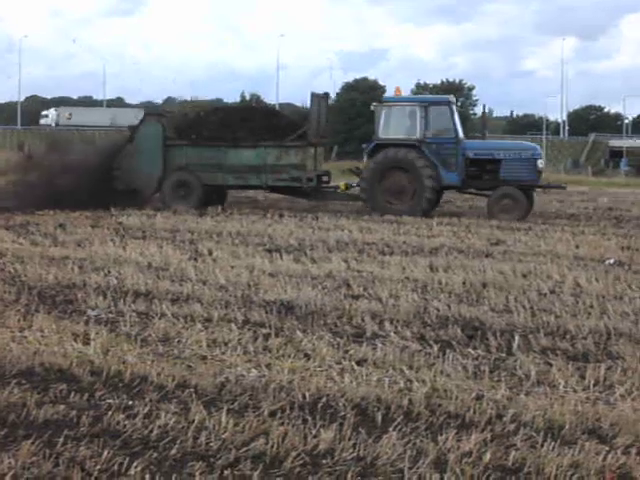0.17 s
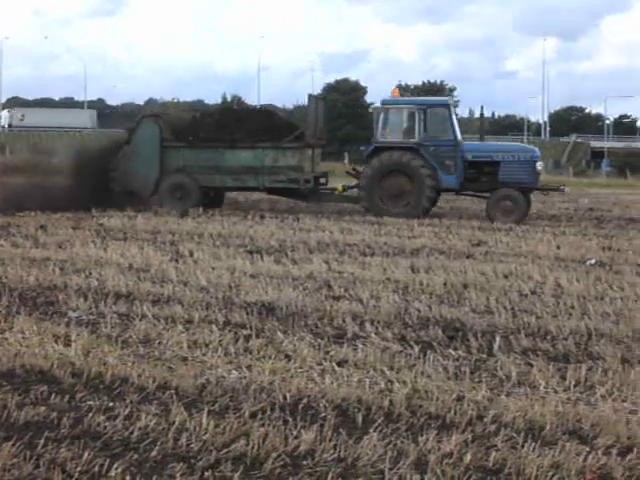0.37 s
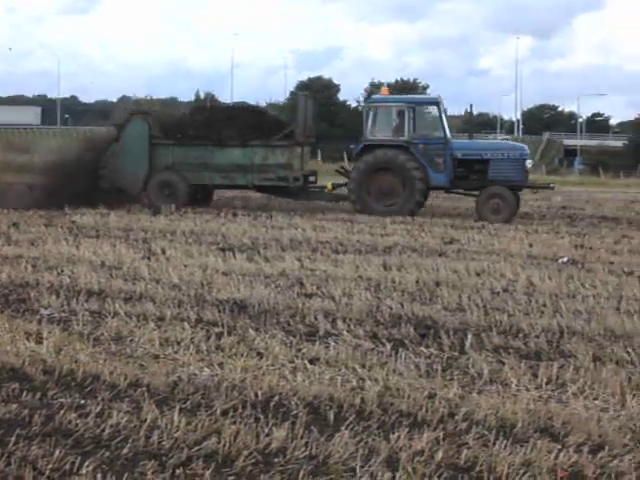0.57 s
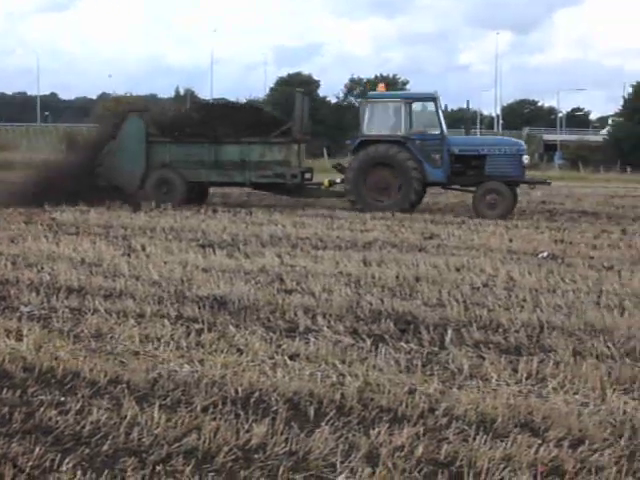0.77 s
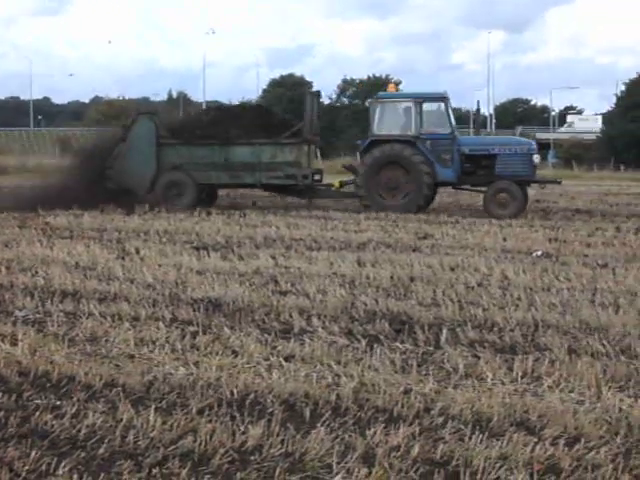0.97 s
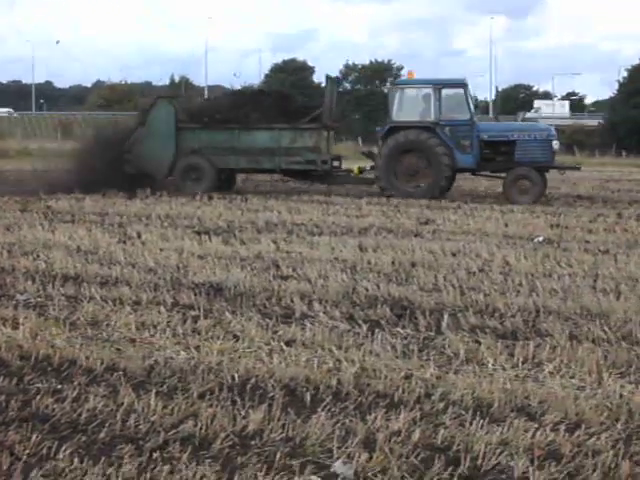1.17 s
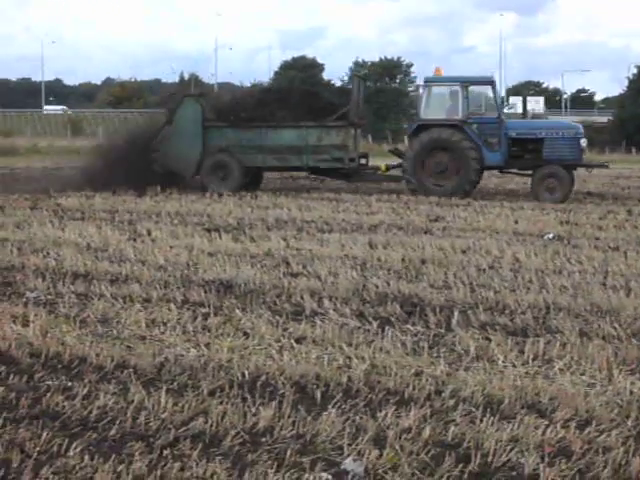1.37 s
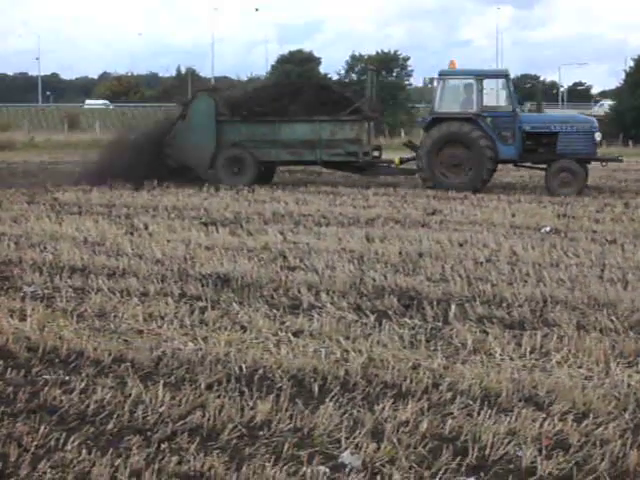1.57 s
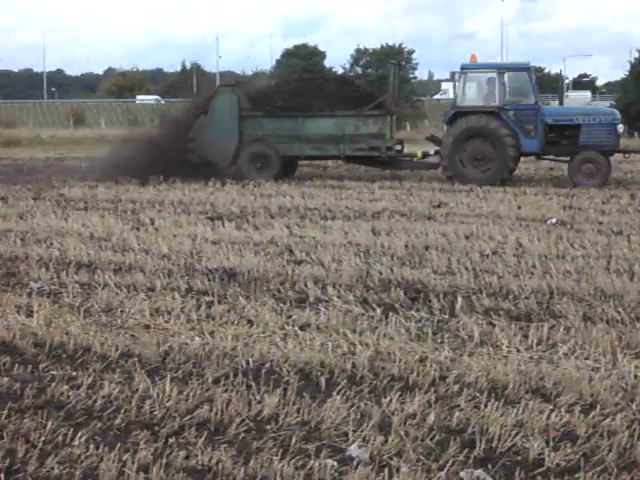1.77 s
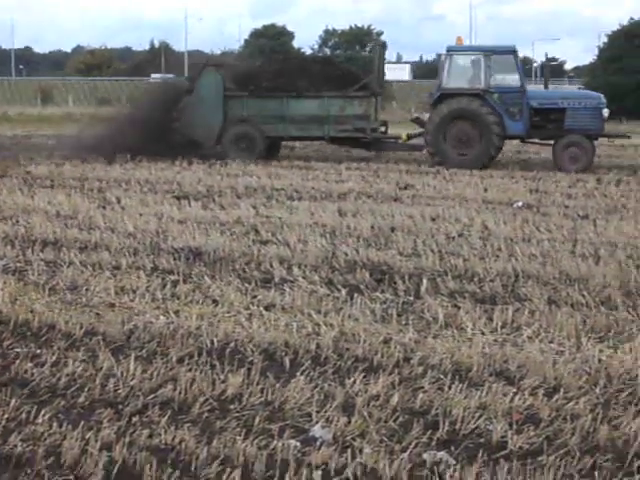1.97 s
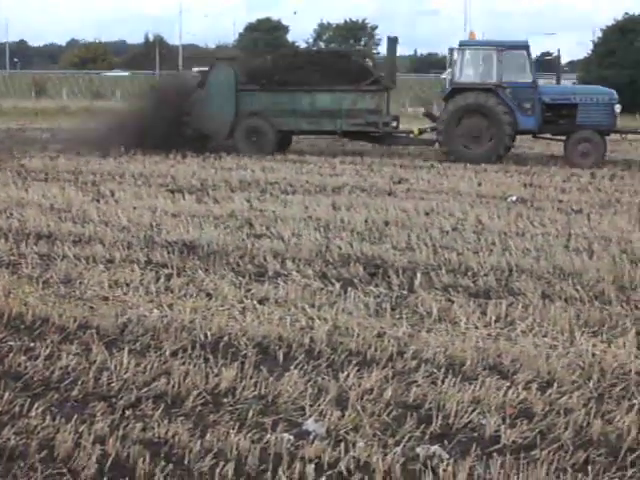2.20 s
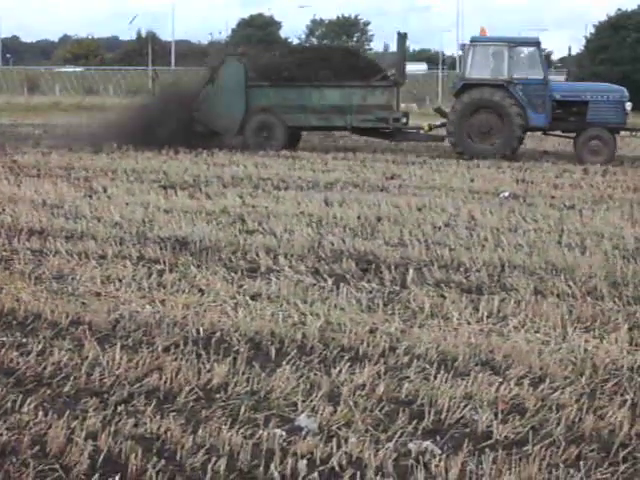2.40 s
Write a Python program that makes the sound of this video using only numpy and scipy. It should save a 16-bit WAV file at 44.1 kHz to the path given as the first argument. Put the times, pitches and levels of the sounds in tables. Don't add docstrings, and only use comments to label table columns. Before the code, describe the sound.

A diesel tractor drones steadily, pulling a rattling muck spreader across an open windy field

```python
import sys
import numpy as np
from scipy import signal
from scipy.io import wavfile
from scipy.ndimage import uniform_filter1d

SR = 44100
rng = np.random.default_rng(int(sys.argv[2]) if len(sys.argv) > 2 else 0)


def transcribe(signal):
    frames = np.atleast_2d(signal).T
    limited = np.clip(frames, -1, 1)
    pcm = np.round(limited * 32767).astype(np.int16)
    wavfile.write(sys.argv[1], SR, pcm)


def voltage_ratio(decibels):
    exponent = np.asarray(decibels, float) / 20
    return 10 ** exponent


N = 112014
TIME_S = np.arange(N) / SR
FIRING_HZ = 53.95


def rms_one(x):
    return x / np.sqrt(np.mean(x ** 2) + 1e-20)


def drift(rate_hz):
    r = np.exp(-80 * np.pi * rate_hz / SR)
    chance = rng.standard_normal(N // 40 + 2002)
    slow = signal.lfilter([1], [1, -2 * r, r * r], chance)[2000:]
    return np.interp(np.arange(N) / 40, np.arange(len(slow)), rms_one(slow))


def curve(table):
    return np.interp(TIME_S, *np.transpose(table))


def resonance(x, hz, width_hz):
    r = np.exp(-np.pi * width_hz / SR)
    zeros = np.array([1, 0, -1]) * (1 - r * r) / 2
    poles = [1, -2 * r * np.cos(2 * np.pi * hz / SR), r * r]
    return signal.lfilter(zeros, poles, x + 1e-18)


def coloured(spectrum, patchy_db, fast_hz):
    table_hz, table_db = np.transpose(spectrum)
    edges_hz = 16 * 2 ** np.arange(0, 8.4, 1 / 3)
    together = drift(fast_hz)
    white = rng.standard_normal((2, N))
    out = 0
    for k, (low, high) in enumerate(zip(edges_hz, edges_hz[1:])):
        sos = signal.butter(2, [low, high], "band", fs=SR, output="sos")
        band = signal.sosfilt(sos, white[k % 2])
        band_db = np.interp(np.log(low * high) / 2, np.log(table_hz), table_db, left=-70, right=-70)
        flicker_db = patchy_db * (0.43 * together + 0.95 * drift(fast_hz))
        out = out + voltage_ratio(band_db + flicker_db) * band
    return rms_one(out)


def beats(hz, jitter_s, spread_db):
    chance = rng.standard_normal((200, 2))
    at = ((np.arange(200) / hz + .005 + jitter_s * chance[:, 0]) * SR).astype(int)
    inside = (at >= 0) & (at < N)
    clicks = np.zeros(N)
    clicks[at[inside]] = voltage_ratio(spread_db * chance[:, 1])[inside]
    return clicks


# multiple of firing rate, level/dB
EXHAUST_TONES = [(1, -28), (2, -23.5), (4, -36), (23, -41)]
REV_WANDER, ORDER_SWAY_DB = 0.0019, 3


def exhaust():
    phase = 2 * np.pi * np.cumsum(FIRING_HZ * (1 + REV_WANDER * drift(0.88))) / SR
    out = 0
    for order, db in EXHAUST_TONES:
        level = np.sqrt(2) * voltage_ratio(db + ORDER_SWAY_DB * drift(12.0))
        out = out + level * np.sin(order * phase + order)
    return out


# f/Hz, level per Hz/dB
KNOCK_SPECTRUM = [(1300, -25.5), (1700, -1.5), (2100, -10), (2600, -0.5), (3300, 2.5), (3900, -7.5),
                  (4600, -5.5), (5400, -10)]
# f/Hz, width/Hz, level/dB
ENGINE_PARTS = [(1710, 72, -38), (2407, 86, -33.5), (4130, 310, -42.5)]
KNOCK_DB, KNOCK_GATE, KNOCK_DECAY_S = -30.5, .75, .005


def knock():
    pole = np.exp(-1 / (KNOCK_DECAY_S * SR))
    firings = beats(FIRING_HZ, jitter_s=.0008, spread_db=2.2)
    flare = uniform_filter1d(signal.lfilter([1], [1, -pole], firings), size=160)
    gate = rms_one(1 - KNOCK_GATE + KNOCK_GATE * rms_one(flare))
    parts = 0
    for hz, width_hz, db in ENGINE_PARTS:
        parts = parts + voltage_ratio(db) * rms_one(resonance(rng.standard_normal(N), hz, width_hz))
    clatter = voltage_ratio(KNOCK_DB) * coloured(KNOCK_SPECTRUM, patchy_db=2.5, fast_hz=13)
    return gate * clatter + rms_one(gate ** 2) * parts


# f/Hz, width/Hz, level/dB
HOUSING_MODES = [(38, 4.3, -53.5), (76.16, 6, -27.5), (134, 9.4, -30), (151.8, 21.2, -22), (170, 14, -28.5),
                 (209.3, 13, -34.5)]
# t/s, level/dB
BITE_DEPTH = [(0.0, -17), (0.06, -29), (0.18, -17.5), (0.2, -20), (0.5, -24.5), (0.54, -17.5), (0.61, -25),
              (1.2, -20.5), (1.22, -27), (1.28, -21.5), (1.34, -35.5), (1.39, -16.5), (1.52, -31),
              (1.53, -18.5), (2.07, -26.5), (2.1, -17), (2.17, -24), (2.54, -20)]
TINE_HZ = 37.7
EVEN_SHARE = 0.82


def drum(tines):
    push = rms_one(tines) + .8 * rng.standard_normal(N)
    rings = []
    for hz, width_hz, db in HOUSING_MODES:
        ring = resonance(resonance(push, hz, width_hz), hz, 2 * width_hz)
        rings.append(voltage_ratio(db) * rms_one(ring))
    boom = sum(rings[2:5])
    swell = rms_one(np.sqrt(uniform_filter1d(boom ** 2, size=2600) + 1e-6))
    bite_db = curve(BITE_DEPTH)
    return sum(rings) - boom + voltage_ratio(bite_db - bite_db.mean()) * boom / swell ** EVEN_SHARE


CLODS_PER_S, CLOD_DB, CLOD_CYCLES, CLOD_TINE_SHARE = 400, -34.5, 5.1, 0.33


def clods(tines):
    spray = 1 - CLOD_TINE_SHARE + CLOD_TINE_SHARE * rms_one(uniform_filter1d(tines, size=400))
    sizes = voltage_ratio(4.8 * np.minimum(rng.exponential(1, N), 4)) * rng.choice([-1, 1], N)
    born = rng.random(N) < CLODS_PER_S * spray / SR
    dealt = rng.integers(0, 14, N)
    patter = 0
    for k, hz in enumerate(np.geomspace(900, 3700, 14)):
        patter = patter + resonance(sizes * born * (dealt == k), hz, 3.0 * hz / CLOD_CYCLES)
    return voltage_ratio(CLOD_DB) * rms_one(patter)


def beaters():
    tines = beats(TINE_HZ, jitter_s=.002, spread_db=3.5)
    return drum(tines) + clods(tines)


# t/s, peak level/dB, f/Hz, length/s
STONE_HITS = [(.034, -20.5, 2800, 0.012), (0.046, -12.5, 3150, 0.0013), (0.114, -14.5, 2600, 0.0057),
              (.888, -13.5, 3740, .008), (.985, -7.5, 3360, 0.0076), (.991, -10, 2380, 0.0058),
              (1.040, -24, 3380, .005), (1.21, -15.5, 2900, .004), (1.337, -6.5, 3420, 0.003),
              (1.637, 1.5, 3550, 0.0086), (1.64, 2, 1500, .007), (1.784, -17.5, 2680, 0.0044),
              (1.949, -15, 3100, 0.0037), (2.034, -25, 2500, 0.0071), (2.127, -8, 2800, 0.0032),
              (2.198, -7, 3074, 0.0069), (2.234, -6, 3320, .005)]
STONE_WIDTH, STONE_RISE_S, STONE_TAIL_S = 0.39, 0.0011, 0.0025


def stones():
    out, t = np.zeros(N + SR), np.arange(2000) / SR
    noises = rng.standard_normal((len(STONE_HITS), 2000))
    for (start_s, db, hz, length_s), noise in zip(STONE_HITS, noises):
        tail = np.exp(-np.maximum(t - length_s, 0) / STONE_TAIL_S)
        shape = np.clip(t / STONE_RISE_S, 0, 1) * tail
        burst = shape * resonance(noise, hz, STONE_WIDTH * hz)
        first = int(start_s * SR)
        out[first:first + 2000] += voltage_ratio(db) * burst / np.abs(burst).max()
    return out[:N]


# t/s, peak level/dB, f/Hz, t60/s
PANEL_RINGS = [(.987, -16, 1440, .045), (.891, -16, 1390, .045), (1.643, -8, 1075, .045),
               (1.6425, -12, 1805, .05), (1.6445, -14, 1455, .045), (2.120, -9, 455, .075),
               (2.123, -13, 520, .06), (2.125, -14, 615, .045), (2.036, -16, 2485, .065),
               (1.051, -16, 1005, .055)]
PANEL_RISE_S = 0.0026


def panels():
    out = 0
    for start_s, db, hz, t60_s in PANEL_RINGS:
        t = TIME_S - start_s
        decay = np.exp(-np.log(1000) * np.maximum(t, 0) / t60_s)
        rise = np.clip(t / PANEL_RISE_S, 0, 1)
        out = out + voltage_ratio(db) * rise * decay * np.sin(2 * np.pi * hz * t)
    return out


# f/Hz, level per Hz/dB
ROAR_SPECTRUM = [(210, -29.5), (350, -7), (448, -9), (542, -9), (880, 2), (1560, -10), (2170, -14),
                 (2450, -11.5), (3100, -11), (4030, -42), (6820, -120)]
# t/s, level/dB
EFFORT = [(0.0, -21), (1.36, -22.5), (1.85, -22.5), (2.26, -22), (2.54, -21.5)]
ROAR_DB = -17


def roar():
    effort_db = curve(EFFORT)
    level = voltage_ratio(ROAR_DB + effort_db - effort_db.mean())
    return level * coloured(ROAR_SPECTRUM, patchy_db=1.01, fast_hz=25.7)


# f/Hz, level per Hz/dB
WIND_SPECTRUM = [(20, -13), (45, 1.5), (100, -1.5), (180, -5), (260, 0), (450, -13.5), (700, -20.5)]
# t/s, peak level/dB, f/Hz
WIND_THUMPS = [(0.013, -15.5, 165), (.108, -21, 160), (0.156, -11, 153.5), (0.219, -16, 170),
               (0.556, -6, 127), (0.874, -4.5, 119), (1.265, -9, 130), (1.286, -6, 138), (1.602, -6, 109),
               (1.805, -18.5, 170), (2.318, -15, 170), (2.470, -11.5, 150)]
WIND_DB, THUMP_CYCLES = -22.5, 0.63


def wind():
    thumps = 0
    for centre_s, db, hz in WIND_THUMPS:
        t = TIME_S - centre_s
        bell = np.exp(-(t * hz / THUMP_CYCLES) ** 2)
        thumps = thumps + voltage_ratio(db) * np.cos(2 * np.pi * hz * t) * bell
    return voltage_ratio(WIND_DB) * coloured(WIND_SPECTRUM, patchy_db=0.0, fast_hz=2.2) + thumps


def scene():
    return (exhaust() + knock() + beaters() + stones() + panels() + roar() + wind())[None]


# t/s, peak level/dB
OVERLOAD_TICKS = [(.0110, -15.5), (0.1089, -27.5), (0.1543, -20.5), (0.2212, -39), (.2217, -18.5),
                  (0.8584, -37), (0.8727, -29), (0.9869, -8.5), (1.2885, -14.5), (1.2883, -35.5),
                  (1.6423, -8), (1.6444, -18), (1.6456, -15), (1.6470, -19), (1.6485, -6), (1.8071, -22),
                  (2.1262, -17.5), (2.1275, -18), (2.3182, -14.5)]
CORNER_HZ = 4000


def overload_corners():
    at_s, db = np.transpose(OVERLOAD_TICKS)
    ticks = np.zeros(N)
    ticks[(at_s * SR).astype(int)] = voltage_ratio(db)
    return signal.sosfilt(signal.butter(2, CORNER_HZ, fs=SR, output="sos"), ticks)


def low_pass(x):
    return signal.sosfilt(signal.butter(12, 15900, fs=SR, output="sos"), x)


SOFT_TOP, CLIP_TOP = .66, .76
STOP_HZ, STOP_FADE_S = 4937, .001


def record(dry):
    x = dry / (1 + (dry / SOFT_TOP) ** 6) ** (1 / 6)
    x = signal.sosfilt(signal.cheby2(12, 70, STOP_HZ, fs=SR, output="sos"), x)
    x = np.clip(x, -CLIP_TOP, CLIP_TOP) + overload_corners()
    x = x * np.clip((N - np.arange(N)) / (STOP_FADE_S * SR), 0, 1)
    return low_pass(x)


dry = scene()
out = record(dry)
transcribe(out)
```